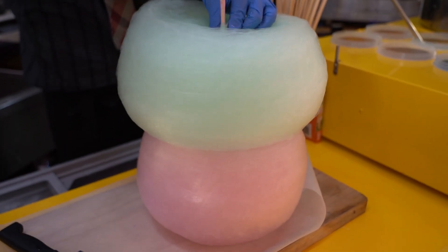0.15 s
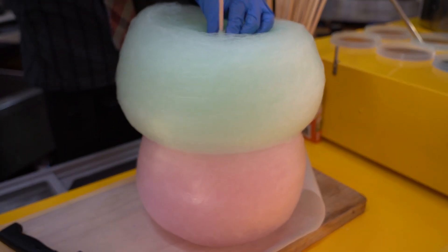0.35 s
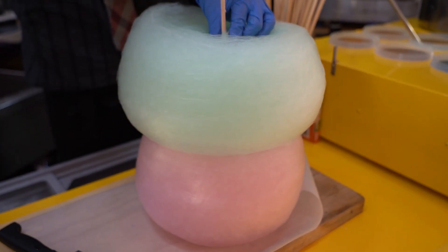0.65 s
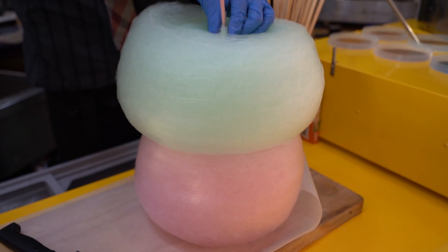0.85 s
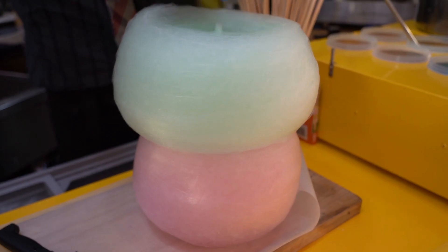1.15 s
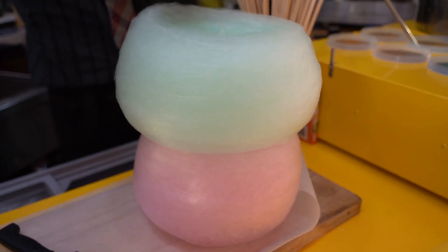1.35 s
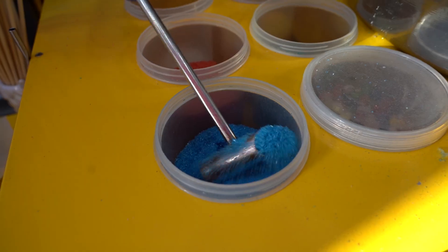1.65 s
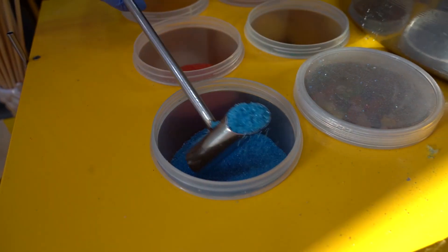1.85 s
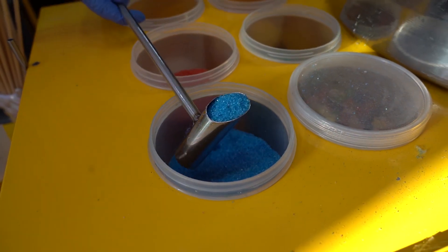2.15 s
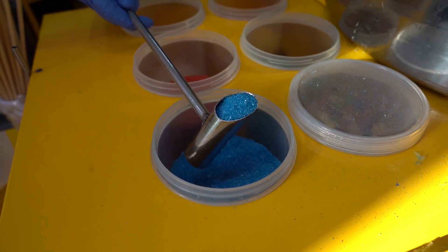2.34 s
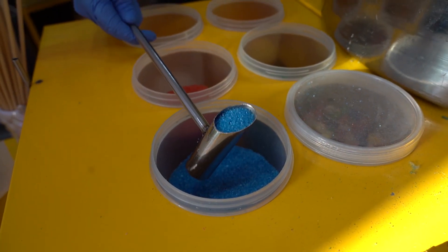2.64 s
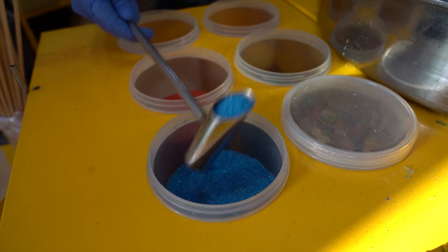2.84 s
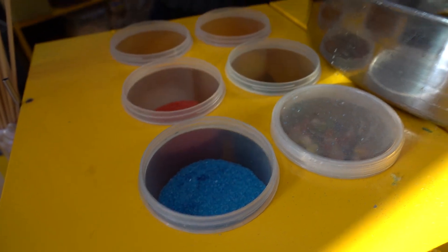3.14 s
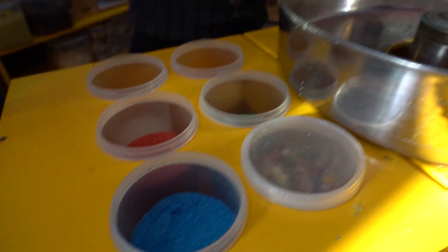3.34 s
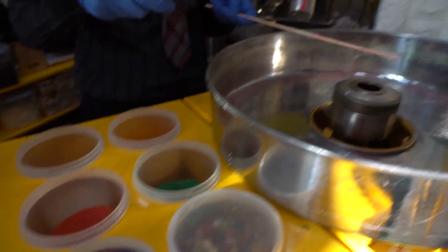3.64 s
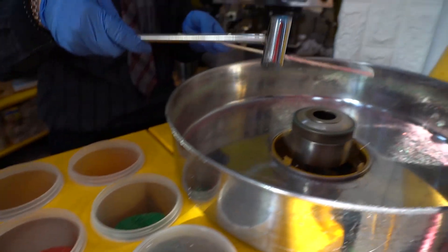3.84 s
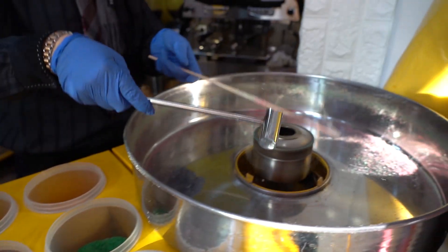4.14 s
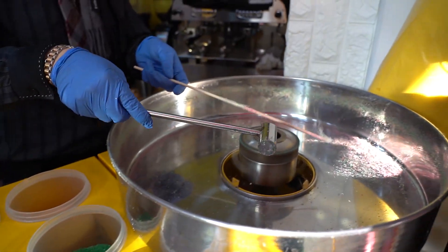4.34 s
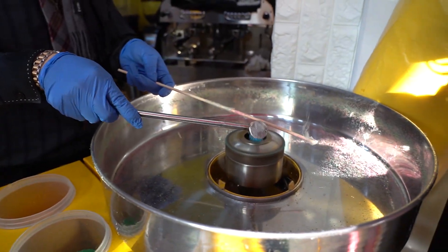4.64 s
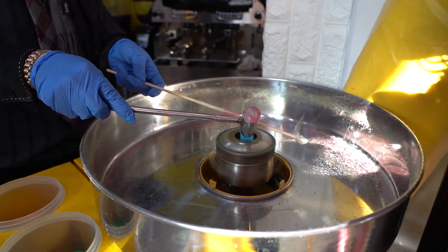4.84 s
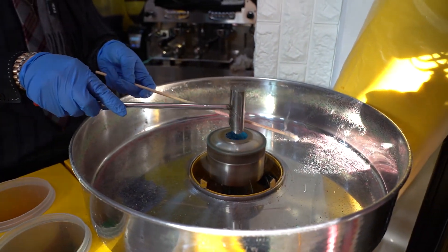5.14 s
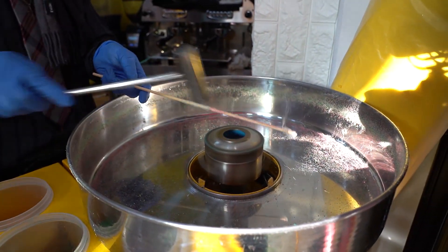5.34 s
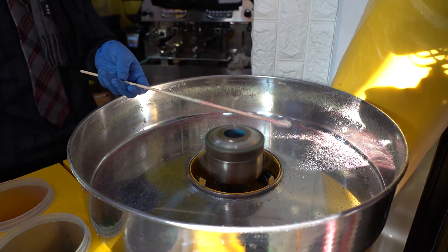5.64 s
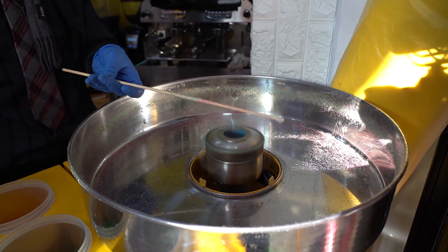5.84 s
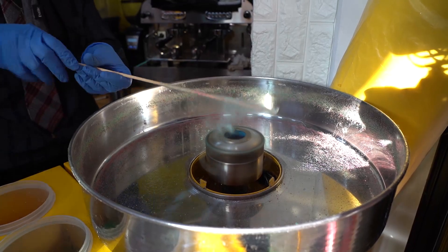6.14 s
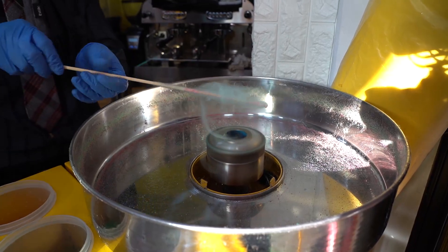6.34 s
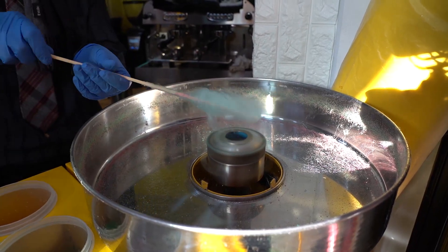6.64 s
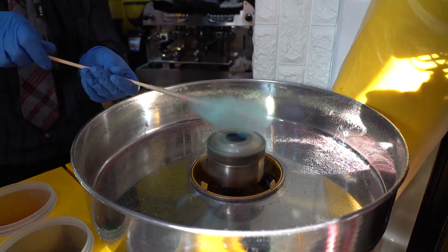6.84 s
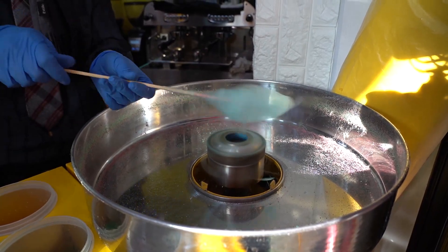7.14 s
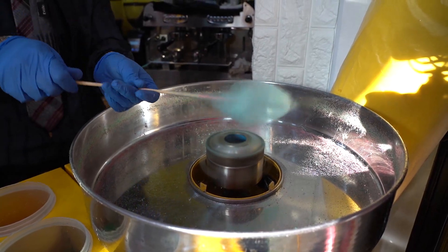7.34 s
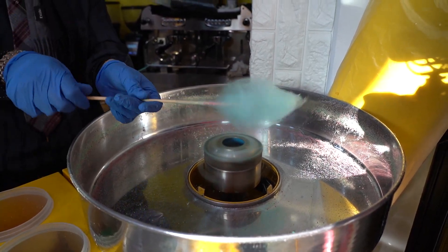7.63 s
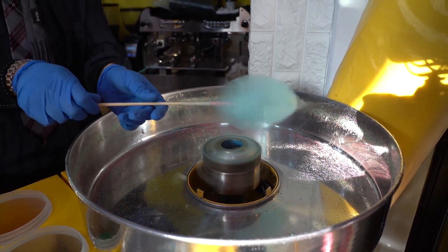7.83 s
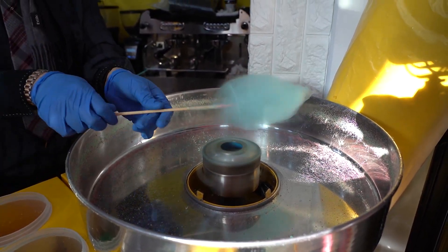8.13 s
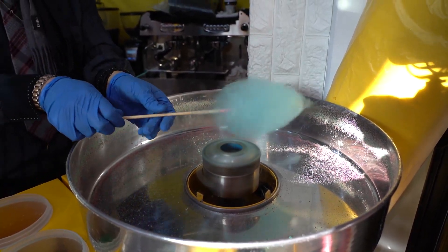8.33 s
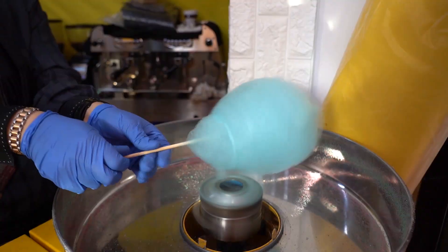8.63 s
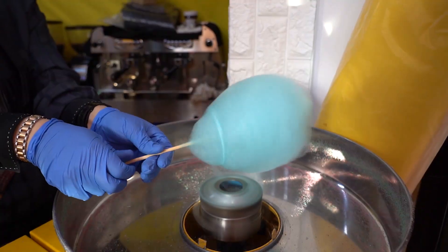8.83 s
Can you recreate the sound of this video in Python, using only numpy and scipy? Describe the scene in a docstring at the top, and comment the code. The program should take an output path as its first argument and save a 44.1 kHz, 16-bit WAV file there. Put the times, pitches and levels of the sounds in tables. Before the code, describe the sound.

In a small food stall, a cotton candy machine runs continuously with a bright, rapidly fluttering whirr, thin whistles and low motor hum. The sound grows closer and brighter when the view changes. A scoop taps a plastic tub four times, a quick dry crackle ends in a loud snap, sugar hisses into the spinning head, and the scoop knocks down on a counter. The whirr dips in pitch, then rises again. Close microphone, no speech.

```python
"""Small food stall: a cotton candy machine runs, heard in mono from four places in turn.
The head rubs nearly alike on every turn: a bright whirr with whistles and passing squeals.
A scoop knocks on a sugar tub, something crackles and snaps, sugar pours into the head, the scoop is put down.
The sugar load brakes the head; as it melts the head runs up again.
Behind: motor hum at turn multiples, mains hum, a rush of air and stall noise, a wobble below hearing."""
import sys
import numpy as np
from scipy import signal
from scipy.fft import rfft, irfft, next_fast_len
from scipy.io import wavfile
from scipy.ndimage import map_coordinates

SR = 44100
rng = np.random.default_rng(int(sys.argv[2]) if len(sys.argv) > 2 else 0)


def to_wav(s):
    """Save 16-bit WAV."""
    ch = np.atleast_2d(s).T  # columns
    pcm = np.round(np.clip(ch, -1, 1) * 32767)  # PCM
    wavfile.write(sys.argv[1], SR, pcm.astype(np.int16))


N = 396018

# Listener path: time_s, place (0 away, 1 tubs, 2 over the bowl, 3 floss; fractions blend)
LISTENER_PATH = [(0, 0), (1.66, 0), (1.672, 1), (3.15, 1), (3.9, 2), (8.48, 2), (8.49, 3)]
# Whirr spectrum at each place: freq_hz, relative_density_db
WHIRR_AWAY = [(1180, -74), (2000, -13), (2830, -11), (3060, -8), (3550, -5.5), (3910, -1.5), (5730, -6),
              (6200, -5.5), (14400, -19), (16000, -26)]
WHIRR_TUBS = [(1180, -17.5), (2000, -13), (3140, -21.5), (3520, -5.5), (3810, -4.5), (4340, -6),
              (4690, -6.5), (5830, -7), (6310, -9), (7700, -15.5), (14300, -22), (16000, -30)]
WHIRR_BOWL = [(1180, -60), (2000, -9.5), (2460, -14), (2830, -1.5), (2960, -6), (3170, -5), (3910, -3),
              (5070, 2.5), (6140, -6.5), (7640, -6.5), (8260, -8.5), (8930, -5), (12700, -8), (14700, -9.5),
              (16000, -21)]
WHIRR_FLOSS = [(1180, -45), (2000, -32), (2980, -2.5), (3280, -14), (3940, -2), (4340, -4.5), (4770, 3.5),
               (5930, -7), (6590, -5), (7190, -9), (12400, -6.5), (16000, -18)]
# Whirr level by place: level_db
WHIRR_PLACE_DB = [-48.5, -40.5, -38.5, -38.5]
# Steady whistles: turn_multiple
WHISTLE_ORDERS = [56, 72, 83, 91, 106]
# Whistles, before place gain: level_db
WHISTLE_DB = [-57, -54.5, -62.5, -55.5, -57]
# Whistle gain by place: gain_db
WHISTLE_PLACE_DB = [-5, -2, -3, -5]
# Passing squeals, before common gain: start_s, end_s, centre_turn_multiple, width_turn_multiples, level_db
SQUEALS = [(1.62, 3.4, 83, .25, -51), (3.5, 5.15, 91, .6, -49), (4.1, 5.15, 55.7, .45, -53),
           (5.25, 6.6, 91.35, .7, -44), (5.35, 6.5, 106, .3, -56), (5.9, 7.1, 87.2, .65, -52),
           (6.5, 8.45, 90.5, 1.3, -51), (6.5, 9.1, 75, .25, -51), (6.75, 8.5, 55, .4, -52),
           (8.45, 9.1, 85, .4, -52)]
# Empty head speed: time_s, turns_per_s
IDLE_SPEED = [(0, 54.03), (3.5, 53.8), (4.5, 53.98)]
# Poured sugar spectrum: freq_hz, relative_density_db
SUGAR_SPECTRUM = [(1500, -19), (3000, -6.5), (5000, 2.5), (7000, -3.5), (12000, 0), (15500, -3)]
# Scoop on the plastic tub: start_s, direct_peak_db
TUB_KNOCKS = [(2.3283, -18), (2.4785, -15), (2.6325, -11), (2.776, -11.5)]
# Tub modes: freq_hz, width_hz, relative_db
TUB_MODES = [(213, 86, 28), (290, 99, 3), (480, 370, 10), (725, 120, -10), (930, 110, 9.5),
             (1360, 190, 3.5), (1860, 200, -9), (3860, 380, -23), (4640, 700, 2)]
# Scoop put down on the counter: start_s, direct_peak_db
COUNTER_KNOCKS = [(5.7453, -10.5), (5.824, -24)]
# Counter modes: freq_hz, width_hz, relative_db
COUNTER_MODES = [(189, 43, 5), (385, 170, -1.5), (634, 140, 1), (1240, 240, -6), (1870, 160, -12),
                 (2100, 230, -13.5), (3470, 940, -14), (5600, 740, -12.5)]
# Dry crackle, a run of contacts each: start_s, second_contact_peak_db (the first is lighter)
CRACKLES = [(3.4295, -6.5), (3.4495, -7), (3.4662, -7.5), (3.4835, -10.5)]
# Crackle modes: freq_hz, width_hz, relative_db
CRACKLE_MODES = [(3080, 160, -8), (3670, 520, 8.5), (5500, 390, 4), (6230, 650, 2), (9600, 3000, -9.5),
                 (14000, 3000, -17)]
# Final snap, a run of contacts: start_s, second_contact_peak_db (the first is slightly louder)
SNAPS = [(3.5447, 3.5)]
# Snap modes: freq_hz, width_hz, relative_db
SNAP_MODES = [(1465, 180, -1), (2110, 350, 1.5), (3770, 580, 4.5), (5010, 300, 6), (5700, 450, 4),
              (7900, 1400, -3), (12700, 7600, -8.5)]
# Motor hum, before place gain: turn_multiple, level_db
HUM_TONES = [(1, -64), (2, -56.5), (3, -54), (4, -56.5), (5, -57.5), (6, -56.5), (8, -60), (23, -58.5)]
# Hum gain by place: gain_db
HUM_PLACE_DB = [-4, 0.7, 0.1, 2]
# Air and stall noise spectrum, away: freq_hz, relative_density_db
AIR_AWAY = [(25, -31), (42, -2.5), (165, -5.5), (190, -7), (231, -4), (384, -5.5), (427, -10), (483, -5),
            (607, -13), (1050, -10.5), (1800, -16.5), (2800, -20.5), (3640, -26), (6160, -120)]
# The same at the three nearer places: freq_hz, relative_density_db
AIR_NEAR = [(25, -31), (42, 2), (112, -10), (134, -5), (167, -2.5), (189, -7), (213, -5), (240, -6),
            (328, -3.5), (396, -6.5), (432, -4.5), (861, -11.5), (1300, -7), (1690, -13), (2600, -14.5),
            (3380, -13), (5720, -120)]
# Air level by place: level_db
AIR_PLACE_DB = [-43.5, -42.5, -41.5, -42]

TIME_S = np.arange(N) / SR
CUTOFF_HZ = 15800
WHIRR_HISS_DB = -7.3  # never-repeating part, re the repeating rub
BOWL_ECHO_S, BOWL_ECHO_GAIN = .000886, .2
WHISTLE_WANDER_DB, HUM_WAVER_DB = 1.5, 1.5
SQUEAL_FADE_S, SQUEAL_GAIN_DB = 0.091, -1
LOADED_TURNS_PER_S, MELTED_TURNS_PER_S, FLOSS_TURNS_PER_S = 53.0, 55.15, 54.52
FILL_START_S, FILL_END_S, MELT_S = 4.7, 5.32, 1.2
# Renewal of the rubbing pattern: empty head, added by full load, added by full flow
RENEW_EMPTY_PER_S, RENEW_LOADED_PER_S, RENEW_POURING_PER_S = 0.99, 1.83, 5.96
POUR_DB, POUR_SWELL_DB_PER_S, POUR_ATTACK_S, POUR_RELEASE_S = -32, 17, .1, .11
SCATTER_DELAY_S = 0.0022  # to the nearest surfaces and back
CRACKLE_GRIT_S, SNAP_GRIT_S = .009, .007
MAINS_HZ, MAINS_DB = 60, -55  # level before hum place gain


def whirr(turns, nearness, renewal_per_s, swell_db=1.0, double_swell_db=0.54, points_per_turn=800):
    """The head passes the same rough track every turn; the track gradually changes."""
    harmonics = rfft(rng.standard_normal((64, points_per_turn)))
    harmonics[:, WHISTLE_ORDERS] = 0  # these sound as whistles
    tracks = irfft(harmonics)
    wear = np.cumsum(renewal_per_s) / SR
    rub = rms_one(map_coordinates(tracks, [wear, turns * points_per_turn], order=3, mode="grid-wrap"))
    rub = rub + from_db(WHIRR_HISS_DB) * rng.standard_normal(N)
    # head slightly out of true: pressure swells once and twice a turn
    angle_rad = 2 * np.pi * turns
    rub = rub * from_db(swell_db * np.cos(angle_rad) + double_swell_db * np.cos(2 * angle_rad))
    # bowl wall echo combs the treble into bands
    rub = rub + BOWL_ECHO_GAIN * np.interp(TIME_S - BOWL_ECHO_S, TIME_S, rub)
    spectra = [WHIRR_AWAY, WHIRR_TUBS, WHIRR_BOWL, WHIRR_FLOSS]
    out = 0
    for near, db, spectrum in zip(nearness, WHIRR_PLACE_DB, spectra):
        out = out + near * from_db(db) * coloured(rub, spectrum)
    return out


def whistles(turns, nearness, waver_rad=0.092):
    """A few turn multiples sing all the time, wandering a little in level and phase."""
    tones = 0
    for multiple, db in zip(WHISTLE_ORDERS, WHISTLE_DB):
        level = from_db(db + WHISTLE_WANDER_DB * drift(1.33))
        tones = tones + level * np.cos(2 * np.pi * multiple * turns + waver_rad * drift(6.6))
    return np.sqrt(2) * (from_db(WHISTLE_PLACE_DB) @ nearness) * tones


def squeals(turns, waver_rad=0.098):
    """A resonance picks out nearby turn multiples: narrow sings steadily, wide chirps once a turn."""
    out = np.zeros(N)
    for start_s, end_s, centre, width, db in SQUEALS:
        level = from_db(SQUEAL_GAIN_DB + db) * gate(start_s, end_s, SQUEAL_FADE_S, SQUEAL_FADE_S)
        on = level > 0
        multiples = round(centre) + np.arange(-3, 4)
        weights = np.exp(-.5 * ((multiples - centre) / width) ** 2)
        phases_rad = 2 * np.pi * np.outer(multiples, turns[on]) + waver_rad * drift(4.7)[on]
        out[on] += level[on] * rms_one(weights @ np.sin(phases_rad))
    return out


def head_speed(load, at_floss):
    """Turns per s: load drags the head below its free speed; constant at the floss place."""
    free = np.where(TIME_S < FILL_END_S, in_time(IDLE_SPEED)[0], MELTED_TURNS_PER_S)
    speed = free + load * (LOADED_TURNS_PER_S - free)
    return speed + at_floss * (FLOSS_TURNS_PER_S - speed)


def sugar():
    """Scoop flow (0-1) and head load (0-1), which builds ever faster, then melts away."""
    tipping = from_db(POUR_SWELL_DB_PER_S * np.minimum(TIME_S - FILL_END_S, 0))
    flow = tipping * gate(FILL_START_S, FILL_END_S, POUR_ATTACK_S, POUR_RELEASE_S)
    filled = np.clip((TIME_S - FILL_START_S) / (FILL_END_S - FILL_START_S), 0, 1) ** 2
    load = filled * np.exp(-np.maximum(TIME_S - FILL_END_S, 0) / MELT_S)
    return flow, load


def pour(flow, grains_per_s=7000, spread_db=2.0):
    """Sugar crystals of uneven size hit the spinning metal."""
    sizes = from_db(spread_db * rng.exponential(1, N)) * rng.choice([-1, 1], N)
    grains = sizes * (rng.random(N) < grains_per_s / SR)
    return from_db(POUR_DB) * flow * coloured(grains, SUGAR_SPECTRUM)


def contacts(events, gap_s, lead_db, fade_db, count):
    """A run of contacts per event: the first set apart by lead_db, the later ones fading."""
    rows = []
    for start_s, db in events:
        for k in range(count):
            step_db = lead_db if k == 0 else -fade_db * (k - 1)
            rows.append((start_s + k * gap_s, db + step_db))
    return rows


def strikes(events, modes, low_hz, high_hz, scatter_db, t60_s, grit_t60_s=None):
    """Each contact, clean or gritty, rings the modes; near surfaces scatter it back as a dense tail."""
    # small bodies radiate no bass; the give of the contact dulls the top
    band = signal.butter(2, [low_hz, min(high_hz, CUTOFF_HZ)], "band", fs=SR, output="sos")
    out = np.zeros(N + SR)
    for start_s, db in events:
        force = dying_noise(grit_t60_s) if grit_t60_s else signal.unit_impulse(SR // 3)
        tail = np.pad(dying_noise(t60_s), (round(SCATTER_DELAY_S * SR), 0))[:len(force)]
        direct, scattered = signal.sosfilt(band, resonate(np.array([force, tail]), modes))
        # scatter_db: tail energy re direct
        scattered = scattered * from_db(scatter_db) * np.linalg.norm(direct) / np.linalg.norm(scattered)
        start = round(start_s * SR)
        out[start:start + len(force)] += from_db(db) * (direct + scattered) / np.abs(direct).max()
    return out[:N]


def motor(turns, nearness):
    """Low turn multiples waver over a mains hum."""
    hum = 0
    for multiple, db in HUM_TONES:
        level = from_db(db + HUM_WAVER_DB * drift(2.17))
        hum = hum + level * np.sin(2 * np.pi * (round(multiple) * turns + rng.random()))
    mains = from_db(MAINS_DB) * np.sin(2 * np.pi * MAINS_HZ * TIME_S)
    return np.sqrt(2) * (from_db(HUM_PLACE_DB) @ nearness) * (hum + mains)


def air(nearness, wobble_low_hz=10.78, wobble_high_hz=14.93, wobble_db=-35.0):
    """Shaped noise as a rush, over narrow-band noise as a wobble below hearing."""
    white = rng.standard_normal(N)
    rush = nearness[0] * coloured(white, AIR_AWAY) + (1 - nearness[0]) * coloured(white, AIR_NEAR)
    band = signal.butter(2, [wobble_low_hz, wobble_high_hz], "band", fs=SR, output="sos")
    wobble = rms_one(signal.sosfilt(band, rng.standard_normal(N + SR))[SR:])
    return (from_db(AIR_PLACE_DB) @ nearness) * rush + from_db(wobble_db) * wobble


def from_db(db):
    """Decibels to amplitude gain."""
    return 10 ** (np.asarray(db) / 20)


def rms_one(x):
    """Scale to unit rms."""
    return x / np.sqrt(np.mean(x ** 2) + 1e-20)


def in_time(rows):
    """One curve per column, joined by straight lines."""
    time_s, *columns = np.transpose(rows)
    return [np.interp(TIME_S, time_s, c) for c in columns]


def gate(start_s, end_s, attack_s, release_s):
    """Rise, hold and fall between two times."""
    return np.clip(np.minimum((TIME_S - start_s) / attack_s, (end_s - TIME_S) / release_s), 0, 1)


def drift(knots_per_s):
    """Smooth random curve, spread about 1."""
    knots = rng.standard_normal(N // 100)
    return map_coordinates(knots, [TIME_S * knots_per_s], order=3, mode="grid-wrap")


def coloured(x, spectrum):
    """Filter a signal by a spectrum, silent outside its range; rms 1."""
    freq_hz, db = np.transpose(spectrum)
    size = next_fast_len(N)
    bins_hz = np.maximum(np.arange(size // 2 + 1) * SR / size, 1)
    gain = from_db(np.interp(np.log(bins_hz), np.log(freq_hz), db))
    gain = gain * (bins_hz >= freq_hz[0]) * (bins_hz <= freq_hz[-1])
    return rms_one(irfft(rfft(x, size) * gain, size)[:N])


def resonate(x, modes):
    """Parallel two-pole resonances, alternating in sign."""
    out = 0
    for k, (freq_hz, width_hz, db) in enumerate(modes):
        r = np.exp(-np.pi * width_hz / SR)
        top = (-1) ** k * from_db(db) * (1 - r * r) / 2
        poles = [1, -2 * r * np.cos(2 * np.pi * freq_hz / SR), r * r]
        out = out + signal.lfilter([top, 0, -top], poles, x + 1e-18)
    return out


def dying_noise(t60_s):
    """Noise burst decaying 60 dB in t60_s; energy 1."""
    age_s = TIME_S[:SR // 3]
    burst = rng.standard_normal(len(age_s)) * from_db(-60 * age_s / t60_s)
    return burst / np.linalg.norm(burst)


def scene():
    """Machine and handling, the same in both channels."""
    place, = in_time(LISTENER_PATH)
    nearness = np.array([np.maximum(1 - np.abs(place - k), 0) for k in range(len(WHIRR_PLACE_DB))])
    flow, load = sugar()
    turns = np.cumsum(head_speed(load, nearness[-1])) / SR
    renewal_per_s = RENEW_EMPTY_PER_S + RENEW_LOADED_PER_S * load + RENEW_POURING_PER_S * flow
    head = whirr(turns, nearness, renewal_per_s) + whistles(turns, nearness) + squeals(turns)
    machine = head + motor(turns, nearness) + air(nearness) + pour(flow)
    tub = strikes(TUB_KNOCKS, TUB_MODES, low_hz=140, high_hz=6100, scatter_db=0.0, t60_s=0.14)
    counter = strikes(COUNTER_KNOCKS, COUNTER_MODES, low_hz=141, high_hz=5500, scatter_db=1.0, t60_s=0.17)
    crackling = contacts(CRACKLES, gap_s=0.0032, lead_db=-5, fade_db=6.5, count=3)
    snapping = contacts(SNAPS, gap_s=.00085, lead_db=1, fade_db=4.5, count=3)
    crackle = strikes(crackling, CRACKLE_MODES, low_hz=2350, high_hz=14000,
                      scatter_db=-7.0, t60_s=0.092, grit_t60_s=CRACKLE_GRIT_S)
    snap = strikes(snapping, SNAP_MODES, low_hz=600, high_hz=14700,
                   scatter_db=-10.0, t60_s=0.21, grit_t60_s=SNAP_GRIT_S)
    return np.tile(machine + tub + counter + crackle + snap, (2, 1))


def record(dry):
    """The snap overloads the input, which clips; then the top is cut."""
    clipped = np.clip(dry, -1, 1)
    lowpass = signal.ellip(10, .1, 70, CUTOFF_HZ, fs=SR, output="sos")
    return signal.sosfilt(lowpass, clipped)


dry = scene()
out = record(dry)
to_wav(out)
```